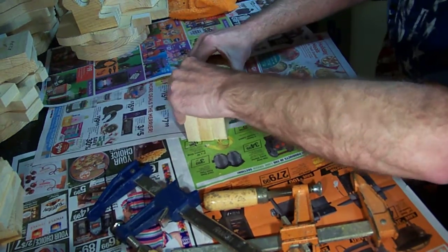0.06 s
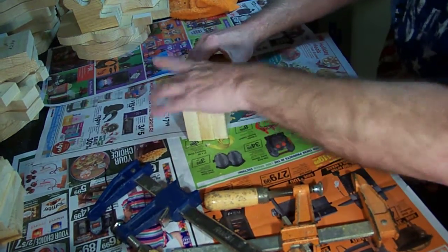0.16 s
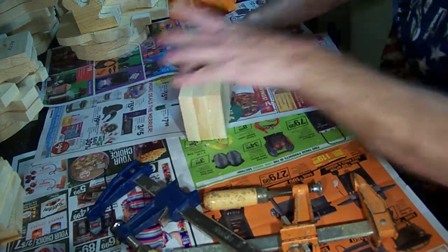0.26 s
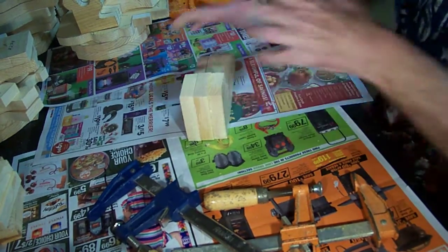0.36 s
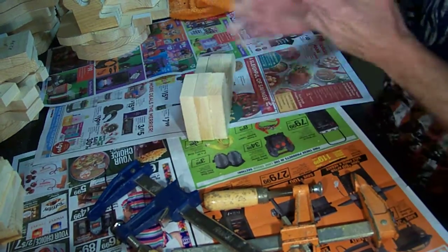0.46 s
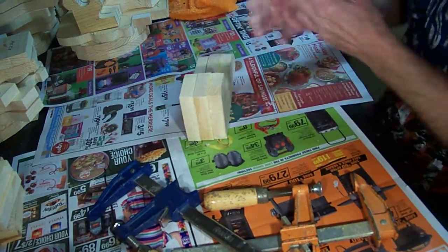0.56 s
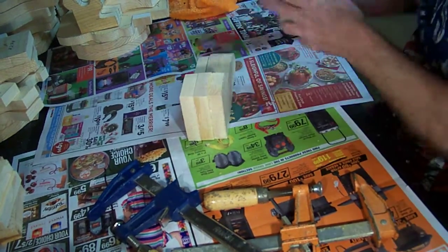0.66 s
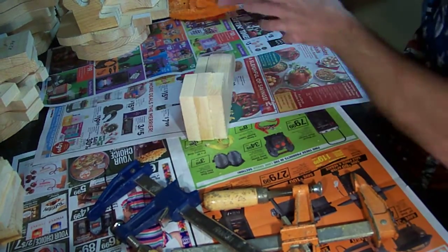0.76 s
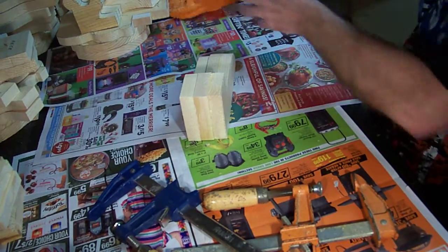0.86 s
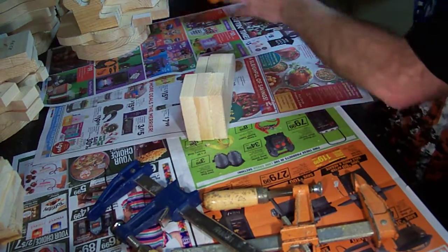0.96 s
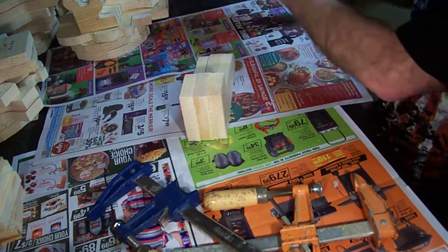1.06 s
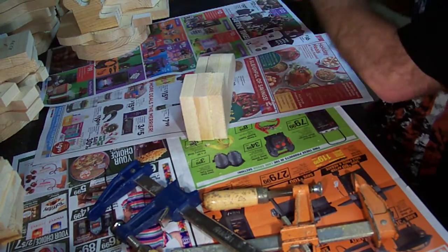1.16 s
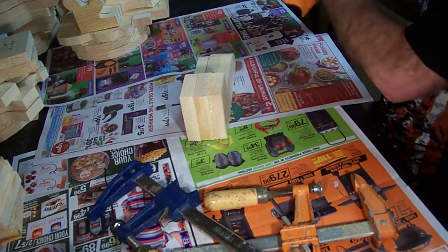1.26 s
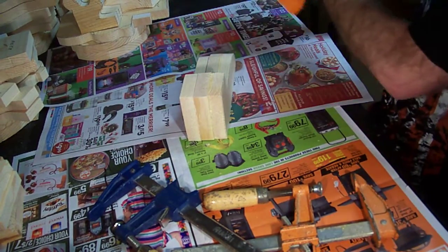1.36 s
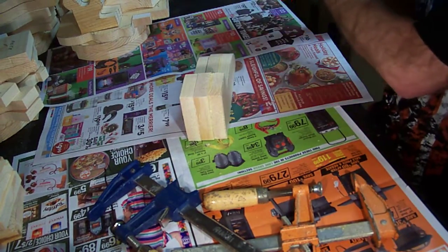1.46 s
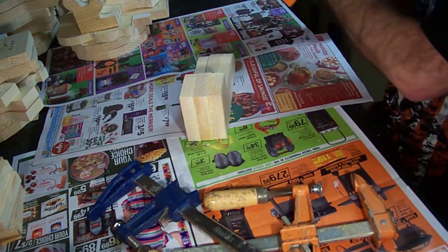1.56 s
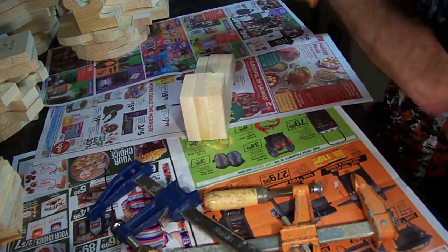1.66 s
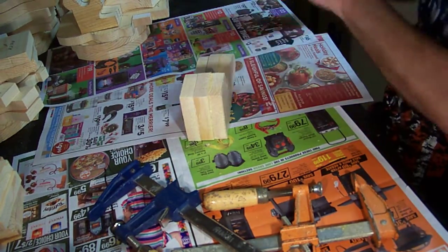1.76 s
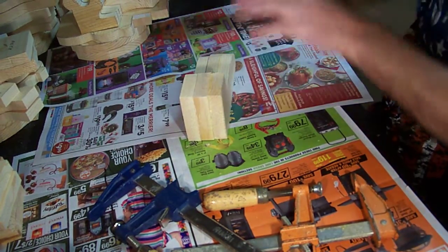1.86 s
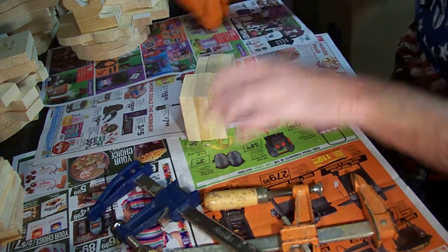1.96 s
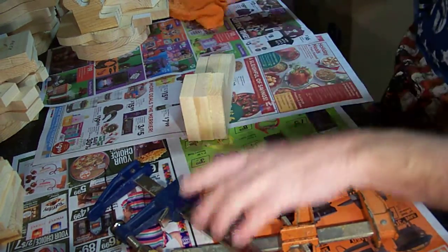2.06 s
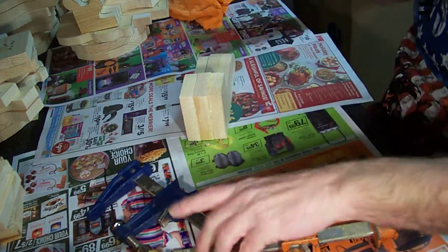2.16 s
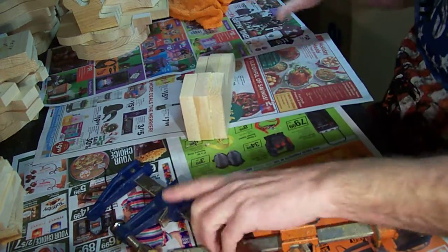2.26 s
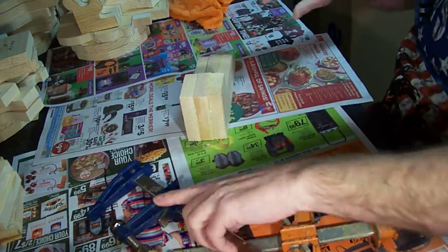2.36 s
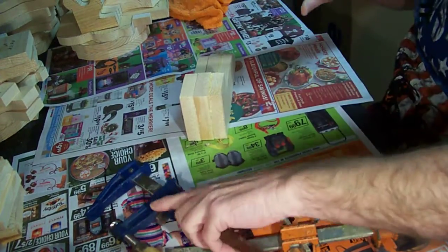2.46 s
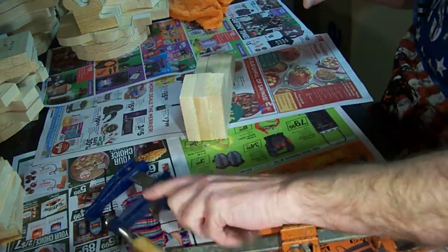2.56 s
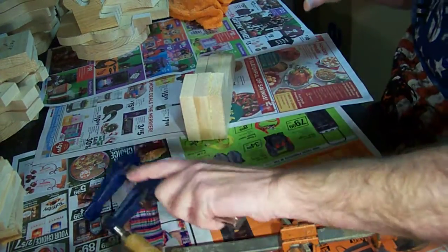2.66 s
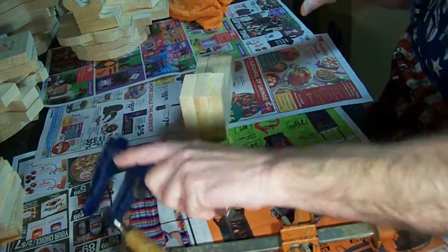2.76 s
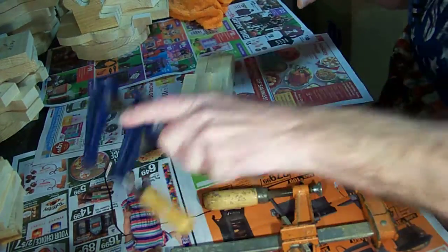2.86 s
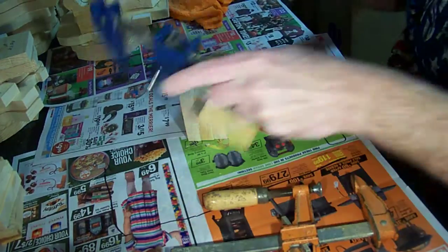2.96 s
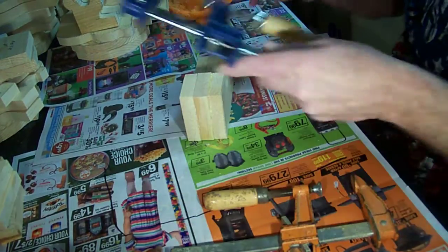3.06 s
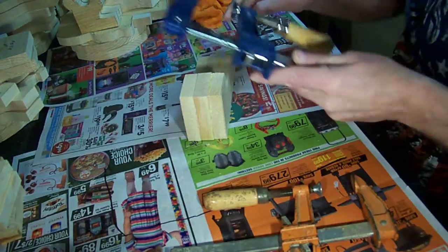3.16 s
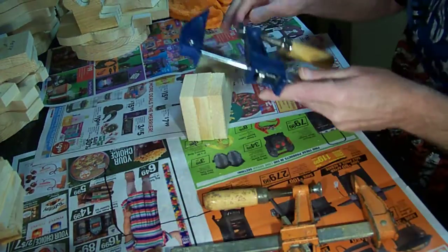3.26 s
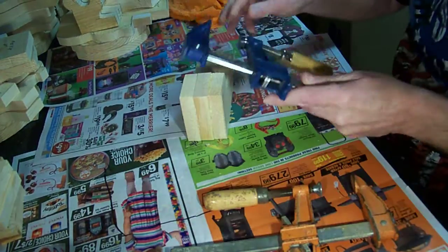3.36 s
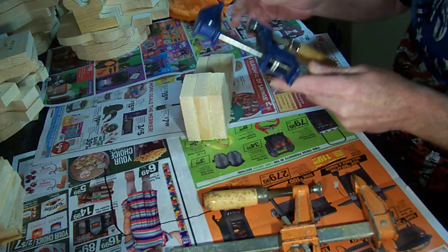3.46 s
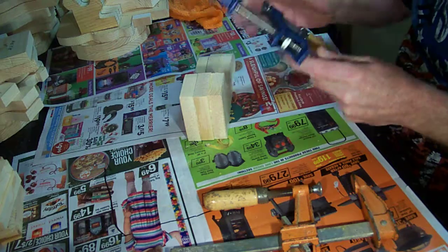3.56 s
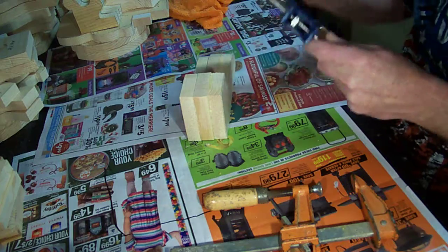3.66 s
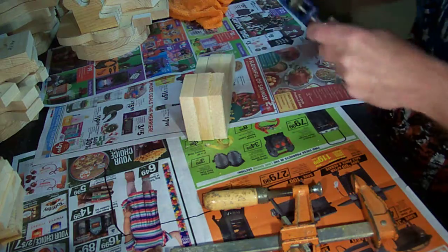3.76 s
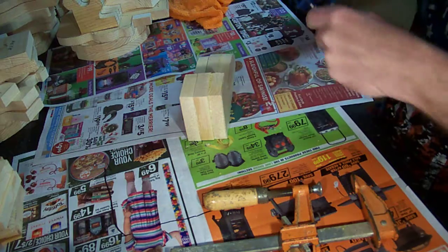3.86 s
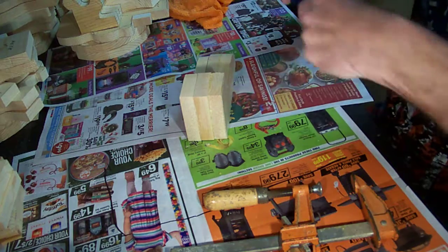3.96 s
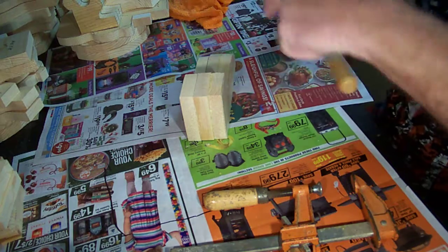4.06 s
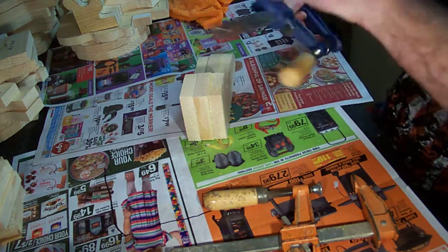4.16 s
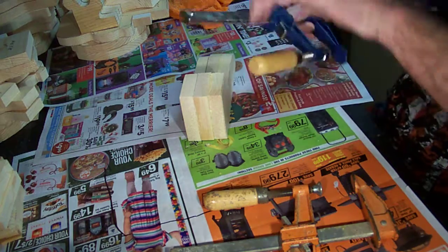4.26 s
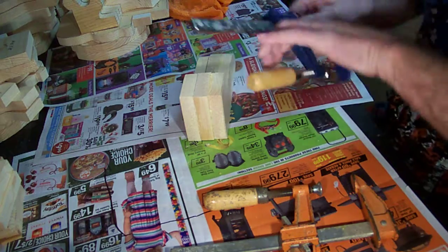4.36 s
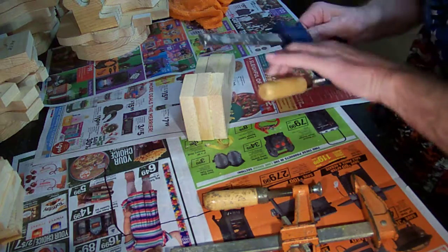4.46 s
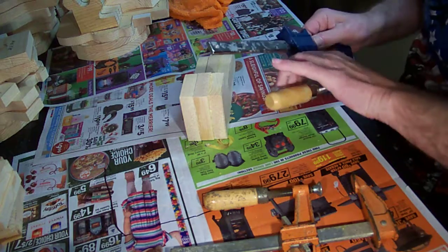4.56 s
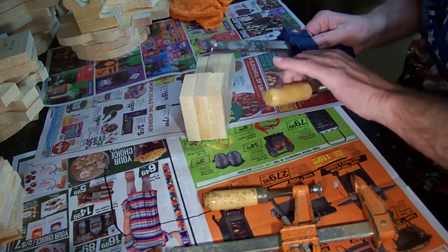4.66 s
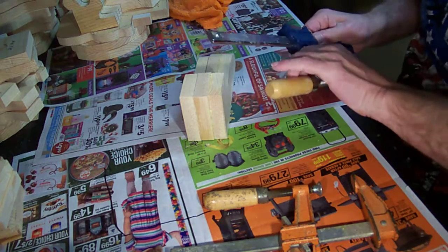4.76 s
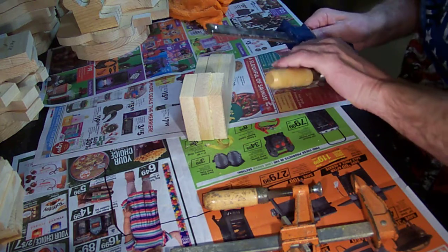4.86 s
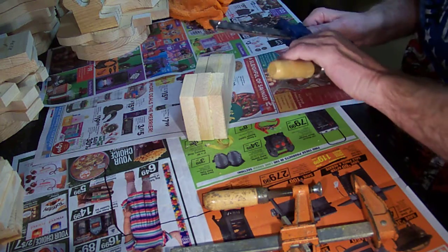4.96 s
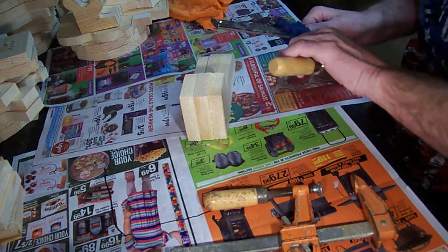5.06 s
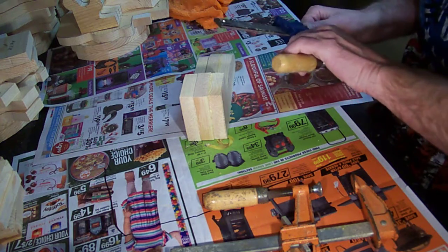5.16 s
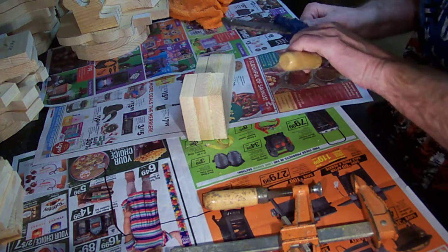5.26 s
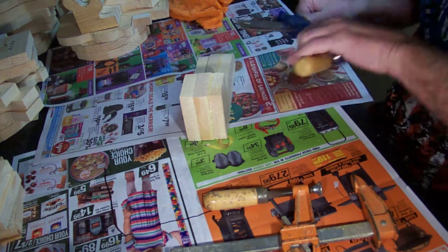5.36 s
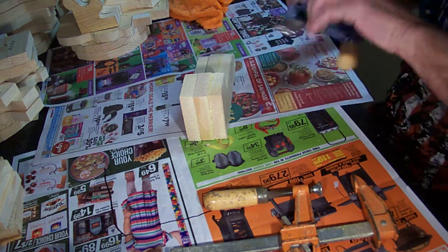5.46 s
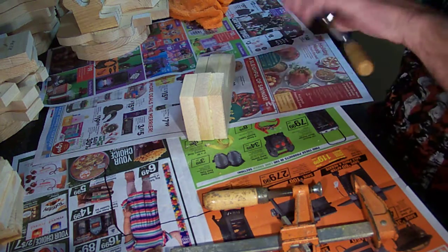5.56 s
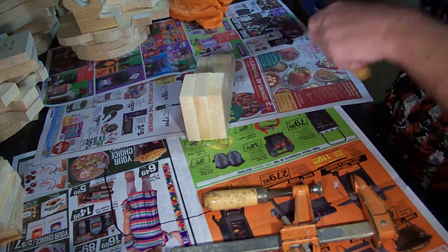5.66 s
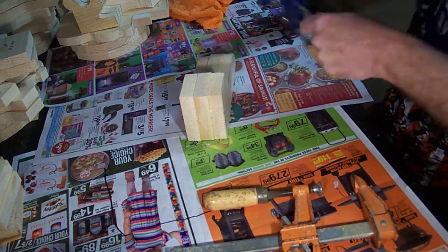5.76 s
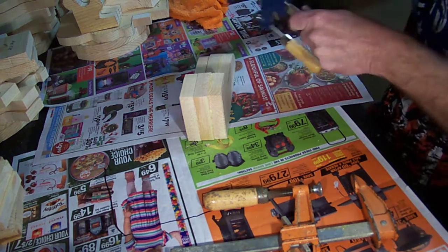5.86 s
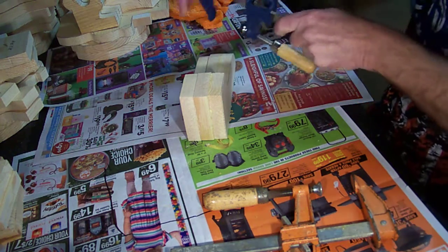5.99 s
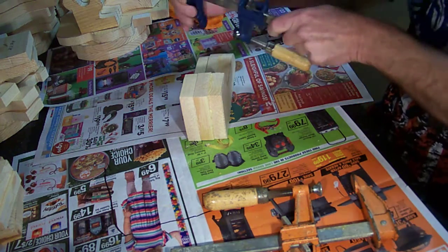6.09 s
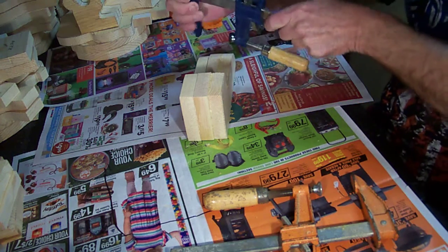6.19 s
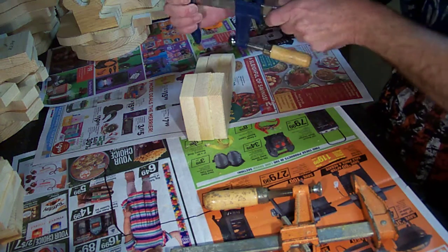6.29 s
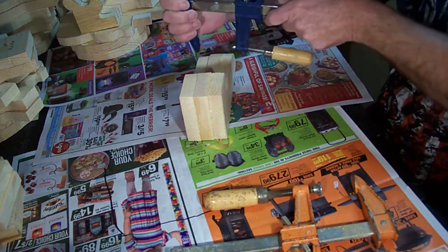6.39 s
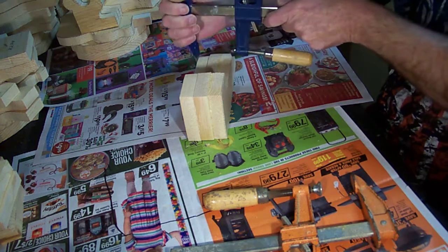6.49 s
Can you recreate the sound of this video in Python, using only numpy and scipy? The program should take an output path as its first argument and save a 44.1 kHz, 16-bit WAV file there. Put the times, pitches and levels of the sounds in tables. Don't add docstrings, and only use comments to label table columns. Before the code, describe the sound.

A steady low ventilation rumble with a soft hiss fills a small, fairly dry workshop. At about 0.2 s hands brush paper on a wooden bench, with a crisp little flick and a faint wipe. Near 1.65 s there is a dull nudge, then short scrapes around 2.1 s. From 2.25 to 2.7 s a steel bar clamp is dragged off, its gritty scuffs mixed with hard metallic knocks and hollow booms from the bench top. Light clicks and faint rattling follow at 3.2 s and 4.0 s as it is lifted. Firmer taps come at 4.8 s as it turns. At 5.38 s a plate slips, and at 5.43 s it hits with the loudest, bright, short clack. A shaken rattle with small, thin rings runs from 5.7 to 5.9 s, then only tiny ticks until 6.5 s. The close stereo microphone sounds dull on top.

```python
import sys
import numpy as np
from scipy import signal
from scipy.fft import rfft, irfft
from scipy.io import wavfile

SR = 44100
rng = np.random.default_rng(int(sys.argv[2]) if len(sys.argv) > 2 else 0)


def store_pcm(level_fs):
    pcm = np.round(np.clip(level_fs, -1, 1) * 32767).astype(np.int16)
    wavfile.write(sys.argv[1], SR, np.atleast_2d(pcm).T)


def ratio_of_db(decibels):
    return 10 ** (np.asarray(decibels, float) / 20)


N = 287973

# pitch_hz [Hz], level_db [dB]
CLAMP_MODES = [(1450, -9.5), (2300, -9), (2700, -1.5), (3150, -2), (3600, -2.5), (3900, -8), (4400, -4),
               (4900, -3), (5240, -7), (5570, -7), (6120, -9.5), (6500, -7.5), (6900, -4), (7200, -8),
               (7800, -18.5), (8200, -6.5)]
# start_s [s], peak_db [dB], ring_hz (loudest ring) [Hz],
# bright_db (highs over lows) [dB]
DRAGGED = [(2.2711, -19.5, 5025, -3), (2.3625, -34, 6400, 10), (2.3683, -17, 1900, -7),
           (2.3885, -31, 1500, -4), (2.4258, -17.5, 5865, 1.5), (2.4592, -37, 5065, 7),
           (2.4665, -17, 3045, 6), (2.5499, -32.5, 3385, -10), (2.555, -31, 2995, 0),
           (2.5603, -19, 3775, -4), (2.581, -37, 3555, -10), (2.5955, -26, 6400, 6), (2.605, -41, 4065, -1),
           (2.6692, -39, 4500, 0)]
LIFTED = [(3.1533, -45.5, 3555, -9.5), (3.1953, -47.5, 3775, -2), (3.2404, -31.5, 3065, 6),
          (3.2443, -32, 2825, 3), (3.2614, -23, 3515, 4), (3.2977, -32.5, 3495, 5),
          (3.3164, -42, 3855, -6.5), (3.9552, -46, 2845, -3), (3.9755, -33, 5000, -2),
          (3.9837, -35, 3500, 0), (4.0626, -35, 4100, 0), (4.1598, -39, 4205, 5), (4.5195, -45.5, 6915, 3)]
TURNED = [(4.785, -39, 4975, -4), (4.8072, -17, 2845, -5), (4.8109, -24, 5000, -4), (4.8437, -25, 5365, -4),
          (4.8465, -23, 4300, -3), (4.9924, -40, 2565, -11), (5.0091, -31, 2300, -2),
          (5.0165, -36, 6100, 0), (5.0343, -34, 6165, -4), (5.0408, -38, 2400, -10),
          (5.159, -35, 2635, -28), (5.224, -46, 4075, -10)]
RELEASED = [
    (5.3713, -28, 2505, -15),
    (5.3796, -17, 5235, 3.5),
    (5.3852, -29, 5605, 7),
    (5.404, -35, 2375, -13),
    (5.4217, -30, 6915, 4),
    (5.4294, -1, 5195, 3.5),
    (5.477, -30, 7265, -5.5),
    (5.4794, -34, 7285, 3.5),
    (5.5497, -46, 2935, 5),
]
SHAKEN = [(5.6912, -26, 6245, -4), (5.706, -39.5, 4355, 3), (5.7194, -32, 4135, -2.5),
          (5.7443, -38, 3235, -1), (5.7516, -30, 5065, 3), (5.77, -23, 6300, 3), (5.7985, -38.5, 4075, 8),
          (5.808, -38, 3705, 6), (5.8559, -27.5, 5100, 6), (5.8592, -30, 7150, 2), (5.8931, -31.5, 6915, 2),
          (5.9062, -29, 3495, 2), (5.9112, -24.5, 7285, 0), (5.9283, -41.5, 4055, 2.5),
          (6.1731, -47.5, 4075, -3), (6.211, -49, 3755, 2), (6.389, -44.5, 7215, 8), (6.4746, -46, 3625, 4),
          (6.5128, -45, 3605, -5.5)]
# start_s [s], peak_db [dB], ring_hz [Hz],
# bright_db [dB]
PINGS = [(2.6137, -42, 3500, -3), (2.628, -42, 3050, -8), (2.643, -50, 3000, -8), (4.0548, -43, 3665, -9.5),
         (4.4053, -33.5, 2935, -14), (4.49, -54, 3575, -13), (4.847, -25, 6355, 0),
         (4.9978, -36, 2605, -13.5), (5.2112, -44, 2175, -19), (5.2872, -44, 2500, -6),
         (5.3141, -38, 2395, -18), (5.411, -39.5, 3175, -8.5), (5.4359, -18, 3145, 10)]
# start_s [s], peak_db [dB], ring_hz [Hz], bright_db [dB]
CHIMES = [
    (5.0115, -35, 3645, -6),
    (5.7545, -38, 3680, 0),
    (5.7755, -43, 7215, 5),
    (5.8095, -41, 3705, 0),
    (5.845, -43, 3665, 0),
    (5.8575, -37, 3650, 0),
]
# ring_t60_s [s], ring_over_crack_db [dB]
GRIPS = [
    (0.022, -12),
    (0.032, -5),
    (0.026, -7),
    (0.033, -5),
    (0.028, -9),
    (0.03, 3),
    (0.075, 8),
]
# start_s [s], boom_db [dB], knock_db [dB], hardness_hz [Hz]
KNOCKS = [(0.182, -52, -44.5, 910), (2.228, -54, -46, 600), (2.275, -36, -46, 1185),
          (2.368, -26, -22.5, 1500), (2.388, -32, -33, 1500), (2.428, -34, -37.5, 1190),
          (2.467, -48, -36, 1830), (2.512, -35, -33, 700), (2.548, -35, -37, 1010),
          (2.562, -32, -39.5, 1200), (2.597, -33, -40, 1040), (2.628, -35, -44, 690), (2.72, -48, -50, 450),
          (4.807, -51.5, -61, 2000), (4.845, -56.5, -52.5, 2000), (5.4295, -64, -39, 1600)]
# pitch_hz [Hz], level_db [dB], t60_s [s]
BENCH_MODES = [(85, -2.5, 0.164), (121.8, 5.5, 0.11), (157, 11.5, 0.1), (180.6, 1, 0.099),
               (226, -6.5, 0.057), (367, -35, 0.13), (489, 8.5, 0.038), (562, -4.5, 0.14),
               (648, 4.5, 0.035), (767, 9, 0.029), (1094, 5.5, 0.047), (1258, 0, 0.07), (1470, -21, .03),
               (1507, -20, .03)]
# peak_s [s], length_s [s], scuff_db [dB], bright_db (highs over scuff) [dB], bench_db [dB]
BRUSHES = [
    (0.192, 0.1, -52, -4, -58),
    (0.32, 0.085, -58, 7, -64),
    (0.42, 0.4, -68, -10, -65),
]
# peak_s [s], length_s [s], scuff_db [dB], bright_db [dB], bench_db [dB]
SLIDES = [
    (1.65, 0.12, -49, -17, -63),
    (2.056, 0.08, -50, 2, -48.5),
    (2.09, 0.06, -51, 1, -47),
    (2.112, 0.04, -55, -3, -53),
    (2.27, 0.15, -70, 1.5, -56),
    (2.38, 0.1, -53, 1.5, -49),
    (2.43, 0.14, -56, -6, -54),
    (2.547, 0.1, -47, -15, -52),
    (2.59, 0.32, -61, -8, -51),
]
# peak_s [s], length_s [s], rustle_db [dB]
FIDGET = [
    (2.54, 0.15, -55),
    (2.61, 0.2, -50),
    (3.23, 0.2, -58),
    (3.33, 0.3, -61),
    (3.95, 0.16, -67),
    (4.18, 0.25, -60),
    (5.01, 0.13, -55),
    (5.4, 0.35, -57),
    (5.9, 0.15, -58),
    (5.74, 0.3, -59),
]
# delay_s [s], level_db [dB]
ECHOES = [
    (.0022, -11.5),
    (.0041, -33.5),
    (.0068, -22.5),
    (0.0124, -25.5),
    (0.014, -30),
]
# pitch_hz [Hz], density_db [dB per Hz]
RUMBLE = [(12, -22), (22, 0.5), (31, -8.5), (43, -0.5), (55, -5.5), (72, -6.5), (96, -1.5), (116, -7),
          (135, -15.5), (165, -16.5), (195, -15), (228, -21.5), (300, -39), (400, -70.5)]
# pitch_hz [Hz], density_db [dB per Hz]
HISS = [(180, -51.5), (300, -20), (331, -8.5), (403, -2.5), (470, -3), (769, -3), (990, -6.5), (1270, -7),
        (1840, -8), (2000, -8.5), (6400, -11.5), (7270, -13.5), (8600, -24), (11200, -69), (18900, -120)]
# pitch_hz [Hz], likeness [0 to 1]
LIKENESS = [(60, 1), (160, 0.84), (450, 0.28), (1220, 0.51), (3320, 0.45), (9040, 0.37)]
# pitch_hz [Hz], left_over_right_db [dB]
LEAN = [(60, -0.5), (210, 0.5), (740, 0.0), (2580, 1.5), (9040, 1.5)]

RUMBLE_DB, HISS_DB = -49, -60.5
RING_SHARE = 0.65
PORT_LAG = 1
HARD_T60_S_PER_DB, DULL_RING_DB_PER_DB = 0.0003, 0.3
BRUSH_LOW_HZ, SLIDE_LOW_HZ = 2200, 1150
BOOM_OVER_KNOCK_DB, BOOM_LONGER = 11, 1.4
RISE_SHARE, SWELL_DB = 0.4, 26
GAIN_STEP = 64


def clamp(crack_s=0.00059, body_db=-19, buzz_db=-14, near=0.9, scatter_db=3.0, body_share=0.65,
          low_pan_db=5, high_pan_db=2):
    size = 2600
    out = np.zeros((2, N + size))
    t = np.arange(size) / SR
    hz, mode_db = np.array(CLAMP_MODES).T
    for start_s, peak_db, ring_hz, bright_db, t60, ring_db in contacts():
        chance = rng.standard_normal((4, len(hz) + 1))
        noise = rng.standard_normal((3, size))
        t60 = max(t60, 0.008)
        low, high = ratio_of_db(min(-bright_db, 0)), ratio_of_db(min(bright_db, 0))
        rise = np.minimum(t / (0.00025 + 0.0006 * ratio_of_db(-39.5 - peak_db)), 1)

        close_db = 8.6 * np.exp(-(np.log(hz / ring_hz) / near) ** 2)
        level = ratio_of_db(mode_db + close_db + body_db + scatter_db * chance[0, :-1])
        level = np.append(level * np.where(hz > 4800, high, low), ratio_of_db(ring_db))
        pitch = np.append(hz * (1 + 0.018 * chance[1, :-1]), ring_hz)
        t60s = t60 * np.append(body_share * np.exp(0.1 * chance[2, :-1]), RING_SHARE)
        fade = level[:, None] * ratio_of_db(-60 * t / t60s[:, None]) * rise
        fade[-1] *= 1 + 0.5 * np.cos(2 * np.pi * 0.05 * ring_hz * t + chance[1, -1])
        fade = fade * sides(np.where(pitch > 4800, high_pan_db, low_pan_db))[:, :, None]
        skew = np.outer([1, -1], 0.6 * chance[3])[:, :, None]
        sound = np.sum(fade * np.sin(2 * np.pi * pitch[:, None] * t + skew), axis=1)

        crack = (noise[0] + 0.21 * noise[1:]) * np.exp(-t / crack_s)
        crack[:, 12] += 5.0
        buzz = (0.96 * noise[0] + noise[1:]) * ratio_of_db(buzz_db - 60 * t / t60)
        shock = rise * (crack + buzz)
        shock_low_hz = np.clip(0.69 * ring_hz, 1800, 2500)
        sound += low * sides(low_pan_db) * band(shock, shock_low_hz, 4560)
        sound -= high * sides(high_pan_db) * band(shock, 5300, 7510)
        sound[1] = np.roll(sound[1], PORT_LAG)
        at = round(start_s * SR)
        out[:, at:at + size] += ratio_of_db(peak_db) * sound / np.abs(sound.mean(axis=0)).max()
    return out[:, :N]


def contacts():
    found = []
    moves = (DRAGGED, LIFTED, TURNED, RELEASED, SHAKEN, PINGS, CHIMES)
    for move, (grip_t60, grip_ring_db) in zip(moves, GRIPS):
        for start_s, peak_db, ring_hz, bright_db in move:
            t60 = grip_t60 - HARD_T60_S_PER_DB * (peak_db + 30)
            ring_db = grip_ring_db - DULL_RING_DB_PER_DB * min(bright_db, 0)
            found.append((start_s, peak_db, ring_hz, bright_db, t60, ring_db))
    return found


def fidget():
    ticks = grit(per_s=400, spread_db=4, alike=0.5)
    rattle = rms_one(sum(ratio_of_db(level_db) * ring(ticks, hz, 0.014) for hz, level_db in CLAMP_MODES))
    return smooth([swell(*row) for row in FIDGET]) * rattle * sides(1.8)


def knocks(direct_db=0, thud_db=-8, thud_t60=0.075):
    size = 8000
    out = np.zeros((2, N + size))
    t = np.arange(size) / SR
    for start_s, boom_db, knock_db, hard_hz in KNOCKS:
        push = np.sin(np.pi * np.minimum(t * hard_hz, 1))
        luck = ratio_of_db(2.5 * rng.standard_normal(len(BENCH_MODES)))
        luck = luck * (1 + 0.15 * rng.standard_normal((2, len(BENCH_MODES))))
        rings = 0
        for k, (hz, level_db, t60) in enumerate(BENCH_MODES):
            strike_db = boom_db if k < 5 else knock_db
            rings = rings + luck[:, [k]] * ratio_of_db(level_db + strike_db - 13.5) * ring(push / push.sum(), hz, t60)
        noise = rng.standard_normal((3, size)) * ratio_of_db(thud_db - 60 * t / thud_t60)
        thud = band(noise[0] + 0.3 * noise[1:], 270, 1.4 * hard_hz + 200)
        direct = ratio_of_db(direct_db) * band(push, 270, 2100)
        at = round(start_s * SR)
        out[:, at:at + size] += rings + ratio_of_db(knock_db) * (direct + thud)
    return out[:, :N]


def sliding():
    slips = grit(per_s=9000, spread_db=2.5, alike=0.6)
    shake = rng.standard_normal(N)
    boom, knock = bench(shake, BENCH_MODES[:5]), bench(shake, BENCH_MODES[5:])
    dull = 0
    for strokes, low_hz in ((BRUSHES, BRUSH_LOW_HZ), (SLIDES, SLIDE_LOW_HZ)):
        gain = smooth([swell(s, length, db) for s, length, db, _, _ in strokes])
        dull = dull + rms_one(band(slips, low_hz, 4320)) * gain
    strokes = BRUSHES + SLIDES
    bright_gain = smooth([swell(s, length, db + bright_db) for s, length, db, bright_db, _ in strokes])
    bright = rms_one(band(slips, 4230, 8500)) * bright_gain
    knock = knock * smooth([swell(s, length, db) for s, length, _, _, db in strokes])
    boom = boom * smooth([swell(s, length * BOOM_LONGER, db + BOOM_OVER_KNOCK_DB)
                          for s, length, _, _, db in strokes])
    return dull * sides(4.0) - bright * sides(1.2) + knock + boom


def bench(force, modes):
    return rms_one(sum(ratio_of_db(level_db) * ring(force, hz, t60) for hz, level_db, t60 in modes))


def workshop(x, tail_db=-30, tail_t60=0.066):
    t = np.arange(8000) / SR
    reply = ratio_of_db(tail_db - 60 * t / tail_t60) * rng.standard_normal((2, 8000)) * np.minimum(t / 0.009, 1)
    for delay_s, level_db in ECHOES:
        for side, stretch in enumerate((0.94, 1.07)):
            reply[side, round(delay_s * stretch * SR)] += ratio_of_db(level_db)
    return x + signal.fftconvolve(x, reply, axes=1)[:, :N]


def air(spectrum, level_db):
    hz = np.arange(N // 2 + 1) * SR / N
    alike = np.clip(at_hz(LIKENESS, hz), 0, 0.95)
    mid, side = rfft(rng.standard_normal((2, N))) * ratio_of_db(at_hz(spectrum, hz))
    pair = np.sqrt(1 + alike) * mid + np.sqrt(1 - alike) * side * [[1], [-1]]
    pair = irfft(pair * ratio_of_db(np.outer([0.5, -0.5], at_hz(LEAN, hz))), N)
    return ratio_of_db(level_db) * pair / np.std(pair.mean(axis=0))


def grit(per_s, spread_db, alike):
    sizes = ratio_of_db(spread_db * np.minimum(rng.exponential(1, (3, N)), 4))
    slips = (rng.random((3, N)) < per_s / SR) * sizes
    slips = slips * rng.choice([-1, 1], (3, N))
    return rms_one(alike * slips[0] + (1 - alike) * slips[1:])


def ring(x, hz, t60):
    r, w = ratio_of_db(-60 / (t60 * SR)), 2 * np.pi * hz / SR
    return signal.lfilter([0, np.sin(w)], [1, -2 * r * np.cos(w), r * r], x + 1e-18)


def swell(peak_s, length_s, peak_db):
    late = (np.arange(0, N + GAIN_STEP, GAIN_STEP) / SR - peak_s) / length_s
    return ratio_of_db(peak_db - SWELL_DB * np.maximum(-late / RISE_SHARE, late / (1 - RISE_SHARE)))


def smooth(gains):
    return np.interp(np.arange(N) / GAIN_STEP, np.arange(len(gains[0])), sum(gains))


def at_hz(points, hz):
    table_hz, value = np.array(points).T
    return np.interp(np.log(hz + 1), np.log(table_hz), value)


def rms_one(x):
    return x / np.sqrt(np.mean(x ** 2) + 1e-20)


def band(x, low_hz, high_hz):
    return signal.sosfilt(signal.butter(2, [low_hz, high_hz], "band", fs=SR, output="sos"), x)


def sides(pan_db):
    return ratio_of_db(np.array([[0.5], [-0.5]]) * pan_db)


def scene():
    close = workshop(clamp() + fidget()) + knocks() + sliding()
    return close + air(RUMBLE, RUMBLE_DB) + air(HISS, HISS_DB)


def top_cut(x):
    return signal.sosfilt(signal.butter(12, 9640, fs=SR, output="sos"), x)


def record(dry):
    notched = signal.lfilter(*signal.iirnotch(968, 22.0, fs=SR), dry)
    rounded = 1.3 * np.tanh(notched / 1.3)
    dull = signal.sosfilt(signal.butter(10, 7400, fs=SR, output="sos"), rounded)
    return top_cut(dull)


dry = scene()
out = record(dry)
store_pcm(out)
```